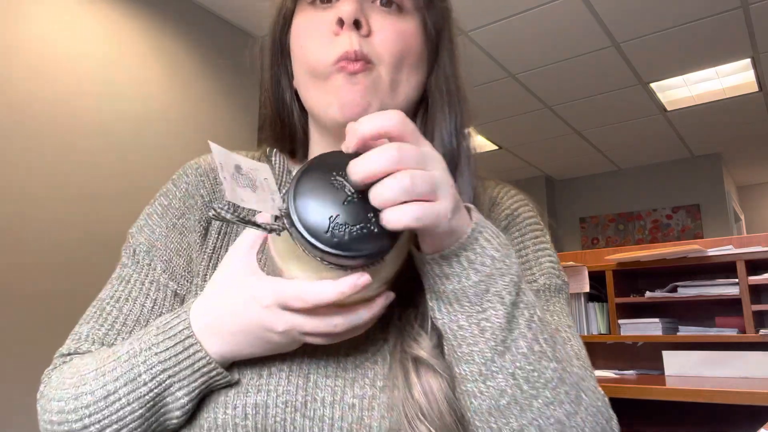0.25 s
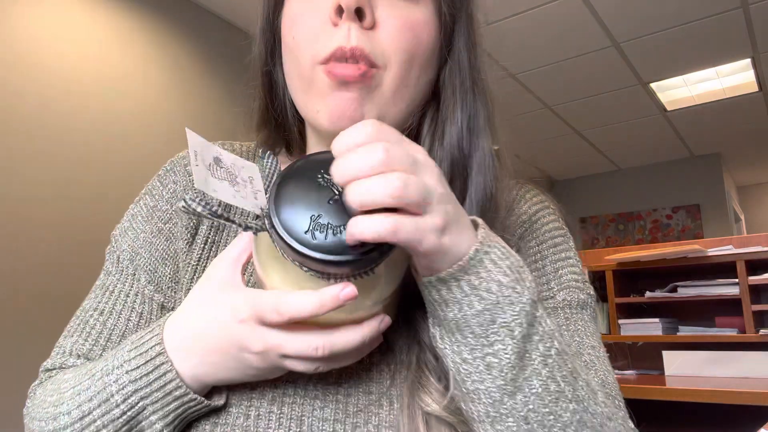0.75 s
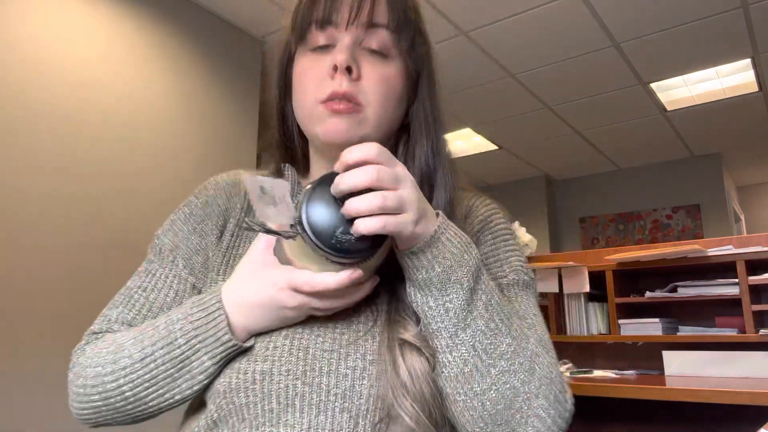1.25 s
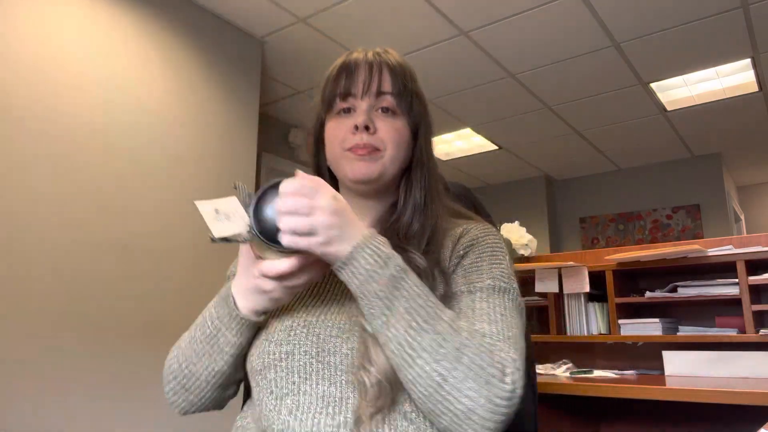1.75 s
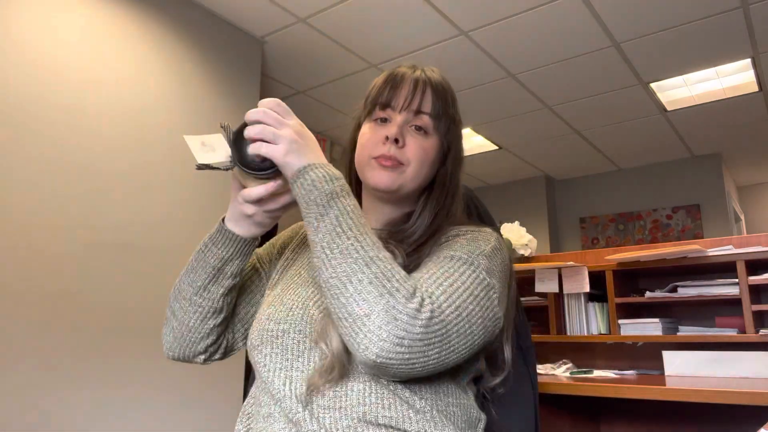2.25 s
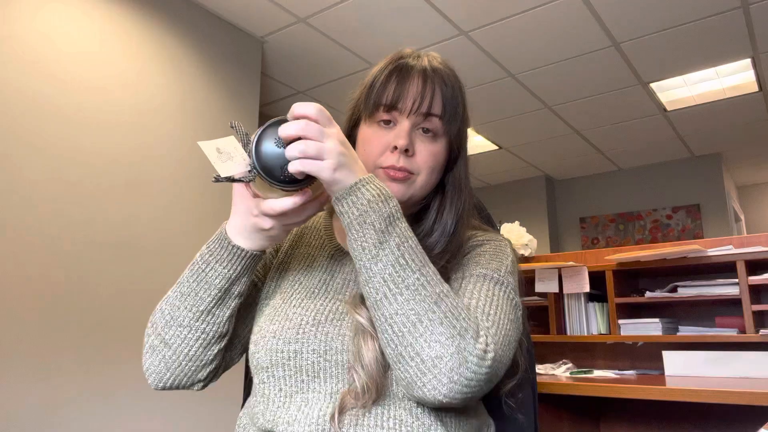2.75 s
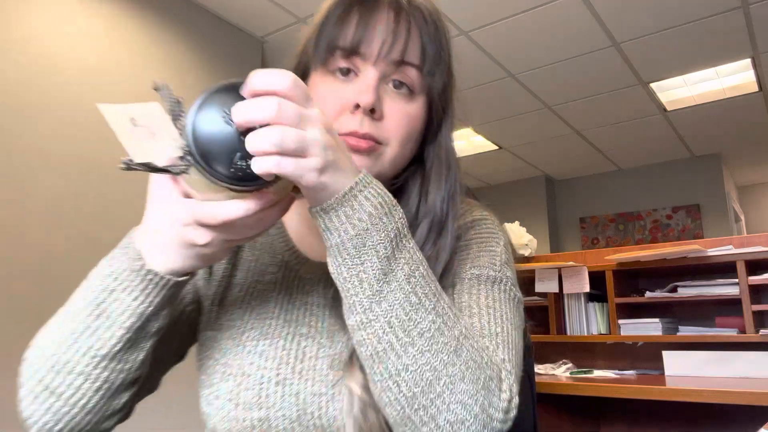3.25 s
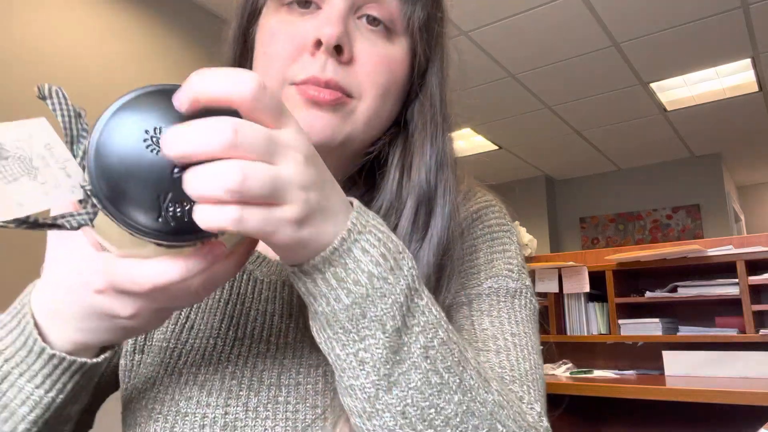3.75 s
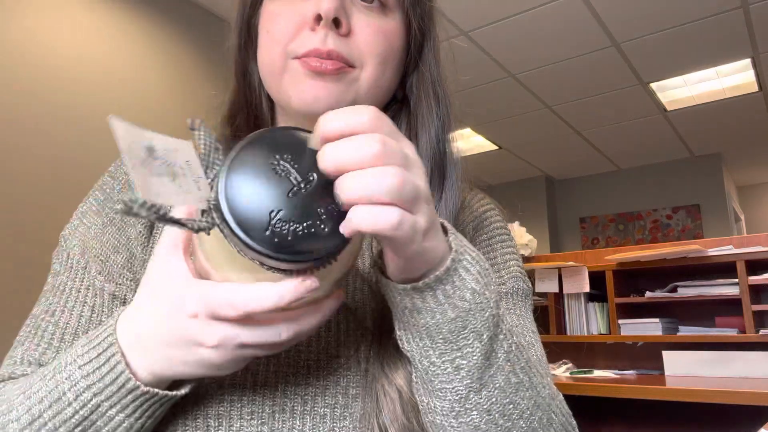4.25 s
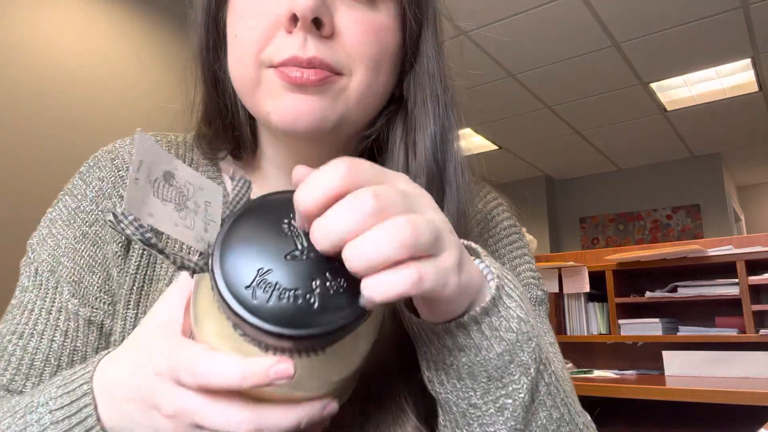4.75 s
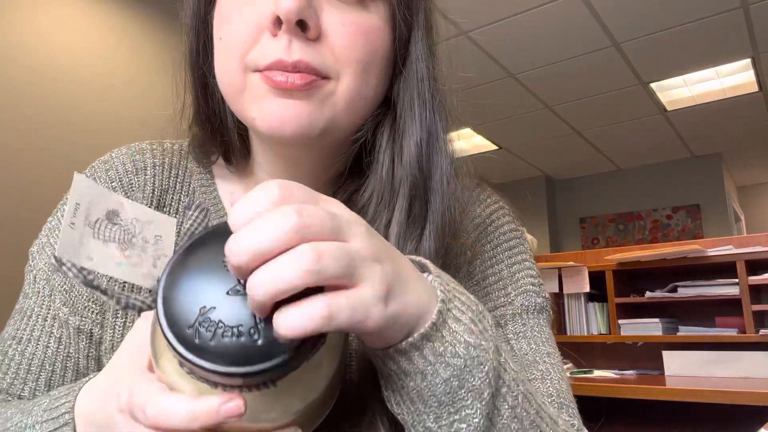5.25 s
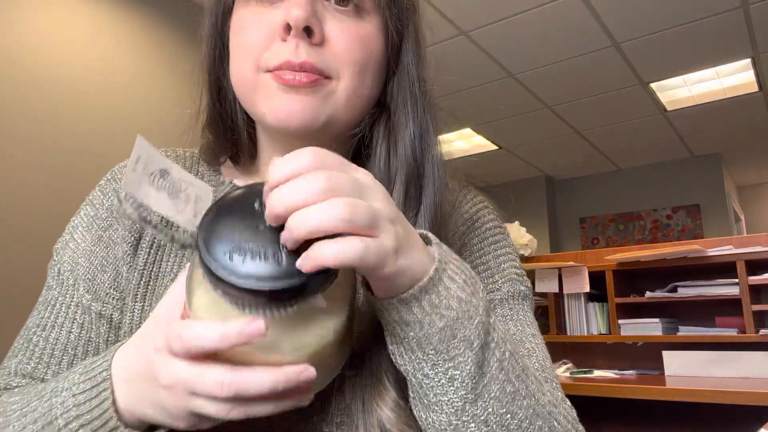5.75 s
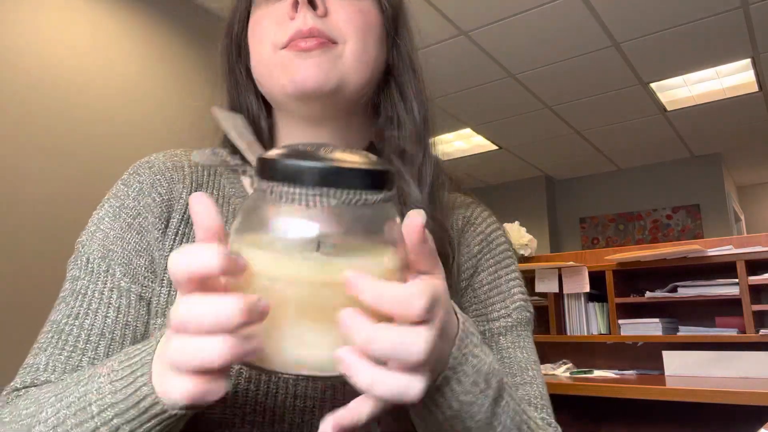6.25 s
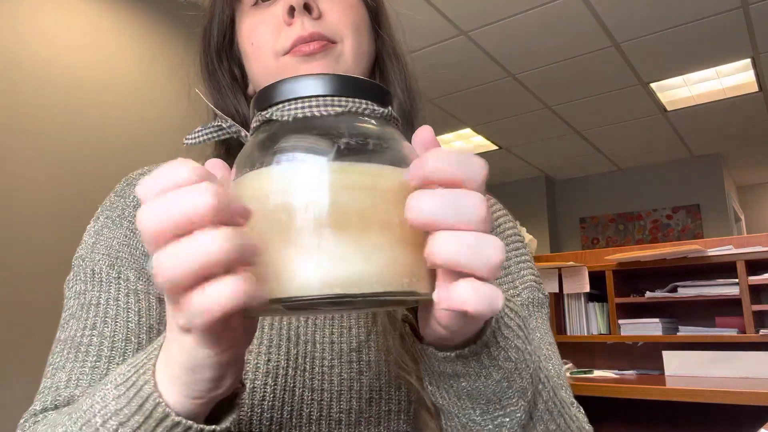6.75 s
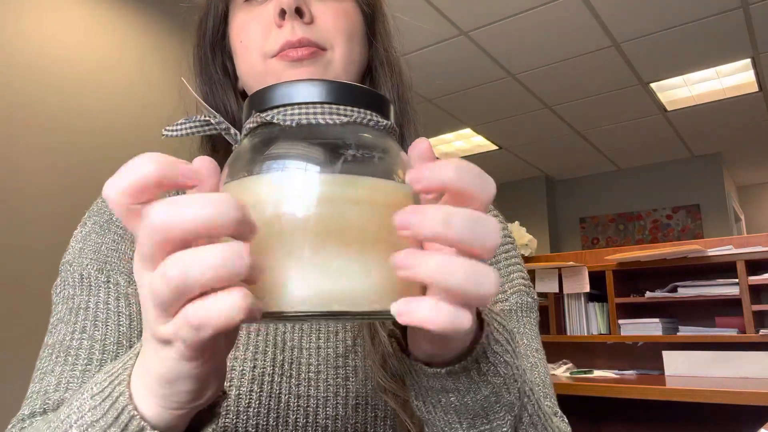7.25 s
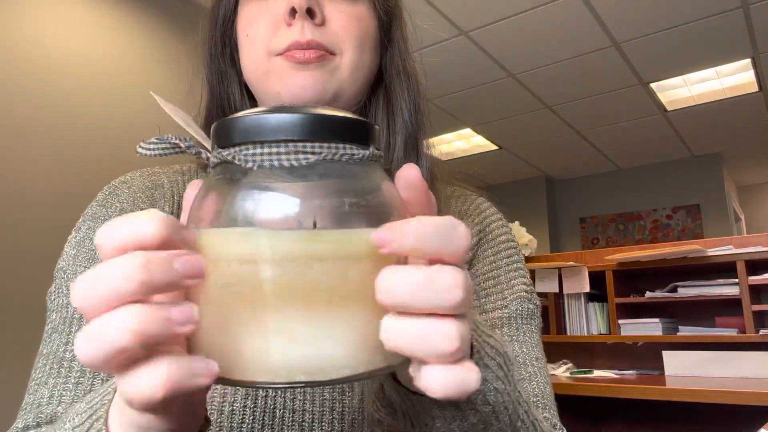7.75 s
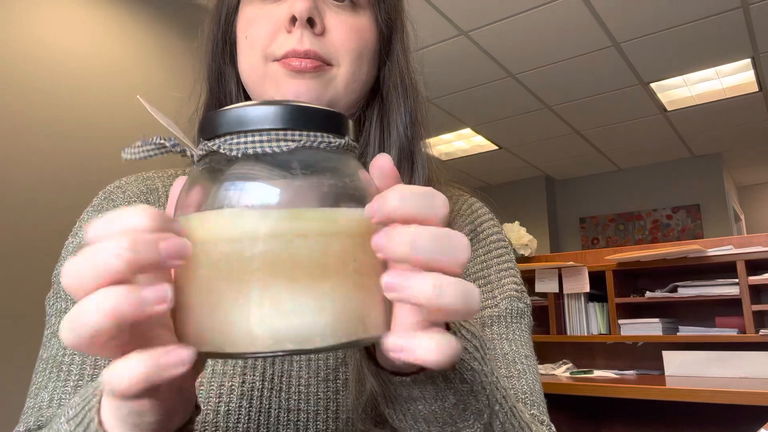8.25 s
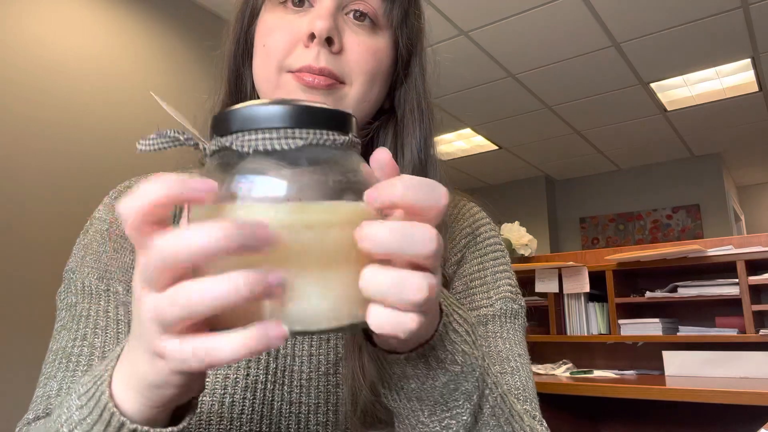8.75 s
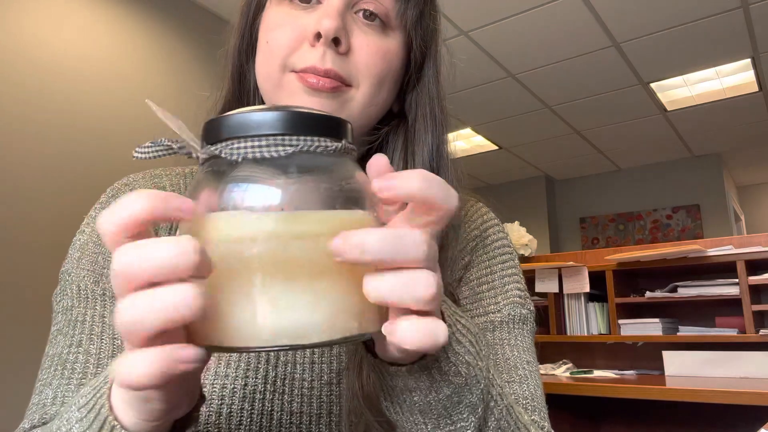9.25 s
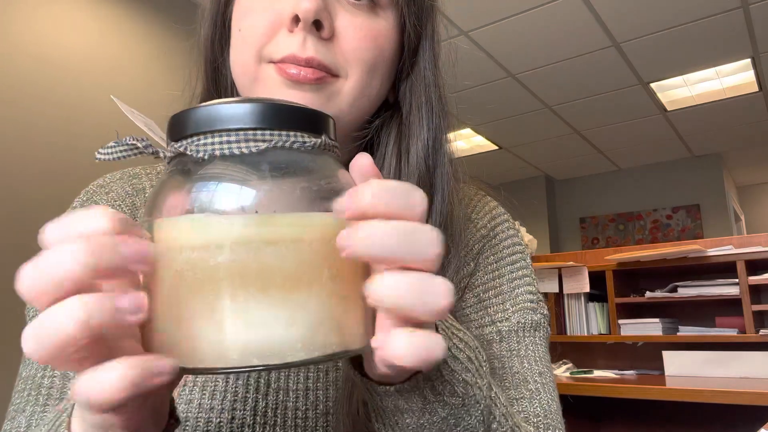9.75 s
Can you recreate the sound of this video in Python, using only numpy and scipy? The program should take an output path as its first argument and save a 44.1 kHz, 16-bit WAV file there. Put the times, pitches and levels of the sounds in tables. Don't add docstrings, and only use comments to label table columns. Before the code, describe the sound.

Nails patter on a metal jar lid right by a stereo phone microphone, each tap crisp on top and hollow beneath, with occasional glassy clinks, light sleeve rumble and finger rustle. After nearly six seconds the drumming stops, the loose lid clatters in two short bursts, and rapid dull little ticks on wax-damped glass follow. Small office with a short echo and soft low air hum.

```python
import sys
import numpy as np
from scipy import signal
from scipy.fft import rfft, irfft, next_fast_len
from scipy.io import wavfile
from scipy.ndimage import uniform_filter1d

SR = 44100
rng = np.random.default_rng(int(sys.argv[2]) if len(sys.argv) > 2 else 0)


def pcm_store(signal):
    levels = np.round(np.clip(np.atleast_2d(signal), -1, 1) * 32767)
    wavfile.write(sys.argv[1], SR, levels.astype(np.int16).T)


def magnitude_from_level(level_db):
    exponent = np.asarray(level_db, float) / 20
    return 10 ** exponent


N = 440118

# time in seconds, level in dB.
HUM_LEVEL = [(0, -45.5), (1.1, -41), (1.6, -35.5), (2.1, -46.5), (3.1, -42), (3.6, -39), (4.8, -45),
             (6.1, -37), (7.2, -42.5), (7.9, -40), (8.4, -42.5), (9.98, -41)]
# frequency in Hz, level in dB per Hz.
AIR_COLOUR = [(53, -32), (90, -5), (257, -3), (472, -12.5), (524, -13), (606, -22.5), (717, -17.5),
              (13500, -63)]
# frequency in Hz, likeness from 0 to 1.
AIR_LIKENESS = [(60, 0.38), (120, 0.79), (250, 0.58), (700, 0.14), (8000, 0.2)]
# frequency in Hz, width in Hz, boost in dB.
DUCT_RESONANCES = [(143, 10, 8), (210, 8.6, 4), (253.5, 11, 6), (299, 8.2, 8), (414, 41, 5.5)]
# time in seconds, level in dB.
STIRRING_LEVEL = [(0, -63), (1.0, -53.5), (1.2, -45), (1.7, -47), (2.0, -80), (3.9, -55.5), (4.1, -49.5),
                  (4.6, -56.5), (4.8, -71), (9.98, -65)]
# frequency in Hz, level in dB per Hz.
STIRRING_COLOUR = [(70, -31), (110, 1), (170, -3), (300, -21.5), (600, -65)]

# start in seconds, ring in dB, knock in dB.
LEANING_IN = [(.0014, -25.5, -22.5), (.0469, -28.5, -32), (.0946, -18, -22.5), (.1029, -42, -23.5),
              (.194, -37.5, -30), (.2399, -28.5, -50), (.2622, -24, -25.5), (.3297, -19.5, -19),
              (.4073, -55, -36.5), (.433, -29, -24), (.4423, -18.5, -22), (.4815, -31, -55),
              (.5002, -25, -26.5), (.5174, -14.5, -20.5), (.593, -20.5, -12), (.623, -36, -38),
              (.6489, -25, -47), (.6627, -24.5, -24), (.6894, -22, -29.5), (.7049, -33, -22),
              (.7178, -17.5, -17.5), (.8371, -26.5, -26), (.9102, -14.5, -17), (.9958, -19, -14),
              (1.0568, -26, -50), (1.0839, -61, -24), (1.1084, -23, -18.5)]
SITTING_BACK = [(1.28, -32, -39), (1.3255, -30, -25), (1.3562, -35.5, -29.5), (1.4534, -49.5, -63),
                (1.526, -53, -38), (1.5587, -47, -35), (1.633, -30.5, -38), (1.6427, -26, -25.5),
                (1.6644, -35, -40.5), (1.6901, -27, -27.5), (1.7181, -34, -24.5), (1.738, -18.5, -20),
                (1.8572, -36, -46), (1.866, -28, -32), (1.8838, -25, -26), (1.9093, -29, -25),
                (1.933, -28, -20), (2.034, -38, -30), (2.0817, -39, -27.5), (2.1018, -24, -26.5),
                (2.3073, -33, -24), (2.3525, -26.5, -38), (2.4944, -35, -24), (2.5217, -25, -21),
                (2.5672, -25.5, -26.5), (2.6072, -29.5, -32.5), (2.695, -53, -21), (2.739, -35, -34),
                (2.774, -33, -34)]
COMING_NEAR = [(2.8393, -26, -19.5), (2.953, -27.5, -28), (3.0466, -29, -27), (3.067, -19, -20),
               (3.1573, -30.5, -20), (3.2243, -34, -26.5), (3.2482, -35, -28.5), (3.2788, -19.5, -20),
               (3.293, -25, -17.5), (3.4178, -43, -20), (3.4512, -24.5, -25), (3.489, -29, -27),
               (3.513, -19, -19.5), (3.6412, -65, -23.5), (3.6551, -55, -24.5), (3.679, -23.5, -23),
               (3.752, -45, -29), (3.7735, -18.5, -17), (3.889, -82, -30), (3.914, -17, -20.5),
               (3.948, -30, -56), (3.9941, -30, -38.5), (4.0045, -20, -20), (4.096, -70, -28.5),
               (4.112, -28, -25), (4.118, -28, -17.5), (4.1847, -25, -22.5), (4.2063, -16, -26),
               (4.365, -39.5, -57)]
HELD_LOW = [(4.383, -36, -36.5), (4.5341, -32, -29.5), (4.5909, -16, -20.5), (4.619, -26, -25.5),
            (4.636, -18, -24), (4.68, -47, -42), (4.6955, -48, -33), (4.7026, -20.5, -17.5),
            (4.7564, -31, -70), (4.807, -38, -31), (4.8383, -20, -20), (4.8713, -26, -27),
            (4.907, -21, -23), (5.0112, -36.5, -36), (5.095, -42, -82), (5.1143, -19.5, -24.5),
            (5.139, -36, -31), (5.224, -23.5, -20.5), (5.255, -22.5, -24.5), (5.2758, -22.5, -24.5),
            (5.3235, -33, -33.5), (5.3588, -17, -21), (5.383, -44, -30), (5.4166, -33.5, -28),
            (5.4625, -23.5, -21), (5.4884, -29, -55), (5.5214, -21, -28), (5.5765, -19, -23),
            (5.5924, -31, -45.5), (5.62, -23, -53)]
BOUTS = [LEANING_IN, SITTING_BACK, COMING_NEAR, HELD_LOW]
BOUT_THUMP_DB = [
    -5,
    -12,
    -7.5,
    -4,
]
# start in seconds, spot from 0 (centre) to 1 (rim).
TAP_SPOTS = [(.047, 1), (.442, 0.44), (.517, 0.39), (.837, 0.28), (.996, 0.5), (1.884, 1), (2.082, 0.83),
             (2.1, 0.52), (2.307, 0.5), (2.84, 0.18), (3.157, 0.41), (3.512, 0.2), (3.68, 0.44),
             (3.913, 0.33), (3.993, 0.38), (4.112, 0.14), (4.185, 0.41), (4.206, 0.65), (4.908, 0.33),
             (5.225, 0.13), (5.276, 0.42), (5.417, 0.2), (5.36, 0.65), (5.577, 1)]
# start in seconds, ring in dB, knock in dB.
GRAZES = [
    (3.503, -13, -19),
    (3.7222, -23, -37),
    (3.7393, -30, -32.5),
    (3.762, -24, -36.5),
    (3.9597, -39, -35),
    (4.2215, -36, -32),
    (6.034, -48.5, -54),
          (0.087, -44, -42), (0.105, -28.5, -24), (0.212, -46, -55), (0.345, -32, -49), (0.354, -51, -36),
           (0.421, -35, -43), (0.534, -59, -49.5), (0.612, -39, -48), (0.64, -35, -37), (0.673, -38.5, -48),
           (0.681, -40, -42), (1.035, -46, -41.5), (1.068, -39.5, -29), (1.297, -50, -52),
           (1.344, -44, -31), (1.769, -30, -40), (1.944, -41, -54), (1.953, -36, -43), (1.968, -37, -43),
           (2.091, -42, -21), (2.298, -41, -34), (2.361, -47, -23), (2.376, -29, -48), (2.385, -47, -35),
           (2.393, -52, -57), (2.549, -30, -19), (2.699, -45, -30), (2.876, -38, -41), (3.03, -39, -41),
           (3.076, -39, -40), (3.207, -30.5, -38), (3.236, -37, -39), (3.337, -32, -35), (3.67, -34, -49),
           (3.804, -33, -56), (3.974, -42, -37), (4.195, -27, -27), (4.343, -46, -37), (4.358, -40, -57),
           (4.614, -48, -36), (4.884, -61, -43), (4.935, -34, -69), (5.159, -35, -60), (5.244, -28, -47),
           (5.348, -46, -52), (5.508, -36, -59), (5.516, -46, -56), (5.541, -49, -55),
           (5.679, -39.5, -47.5)]
# start in seconds, ring in dB, knock in dB, lid thump in dB.
RATTLES = [
    (6.1027, -25, -19.5, -25.5),
    (6.111, -28, -17, -27),
    (6.116, -25.5, -26, -39),
    (6.1216, -43, -24.5, -34.5),
    (6.3552, -29, -19.5, -23.5),
    (6.3593, -41, -19, -31),
    (6.3604, -25, -55, -47.5),
    (6.372, -26, -40, -35),
    (6.375, -47, -20, -55),
]
# frequency in Hz, level in dB, t60 in seconds.
TIN_MODES = [(6300, -5, .09), (6850, -3, .08), (7230, -8, .05), (7470, -6, .1), (7580, -2, .06),
             (8330, 0, .07), (8580, -6, .07), (8960, -8, .07), (9240, -4, .09), (9600, -3, .05),
             (9910, -4, .06), (10250, -3, .07), (10630, -8, .07), (11010, -8, .07), (11500, -11, .07),
             (12080, -12, .05), (12700, -14, .06)]
# frequency in Hz, level in dB, t60 in seconds.
RIM_MODES = [(4760, 0, .18), (4620, -12, .05)]
# frequency in Hz, level in dB, t60 in seconds.
THUMP_MODES = [(150, -15.5, 0.2), (210, 5.5, 0.082), (286.8, 6.5, 0.07)]
# frequency in Hz, level in dB, t60 in seconds.
HOLLOW_MODES = [(554, -9.5, 0.017), (752, 0, 0.02), (972, -0.5, 0.028), (1402, -3.5, .025),
                (1794, -4.5, 0.022), (2493, -7, 0.022)]
# frequency in Hz, level in dB per Hz.
KNOCK_COLOUR = [(160, -26), (330, 2.5), (480, -8), (950, -8), (1400, -12.5), (1800, -12.5), (2500, -17),
                (3100, -28.5), (4200, -21)]
# frequency in Hz, level in dB per Hz.
CRACK_COLOUR = [(2600, -60), (3600, -72), (4700, -5), (5600, -4), (6300, -2), (7600, 5), (10200, -45.5),
                (13000, -4), (13800, -6.5), (15200, 0.5), (16500, -52)]
# start in seconds, level in dB.
SHOULDER_HITS = [(.4423, -34), (0.9965, -26), (2.3068, -24.5), (2.5206, -23.5), (3.1577, -17.5),
                 (3.2777, -35), (3.5034, -36), (3.7734, -28), (4.1141, -13), (4.2057, -30.5), (6.11, -21),
                 (6.3597, -20)]
# frequency in Hz, level in dB, t60 in seconds.
SHOULDER_MODES = [(1720, 3, 0.011), (2230, 1.5, .015), (2920, -5.5, 0.011), (3520, -2.5, 0.017),
                  (3940, 0, 0.013)]

# start in seconds, level in dB.
JOLTS = [
    (1.119, -34),
    (3.303, -21.5),
]
# time in seconds, level in dB.
SLIDE_LEVEL = [(1.26, -68), (1.3, -51), (1.6, -54.5), (1.7, -59), (5.86, -78.5), (5.95, -59), (6.08, -54.5),
               (6.5, -72), (9.98, -68)]
# start in seconds, level in dB, pitch in Hz, t60 in seconds.
RIM_SQUEAK = (1.281, -35, 3350, .045)
# frequency in Hz, level in dB, t60 in seconds.
JAR_MODES = [(1790, 2, 0.047)]

# start in seconds, knock in dB,
# tick in dB.
GLASS_TAPS = [
    (6.252, -35, -46),
    (6.281, -29, -36.5),
    (8.2779, -27.5, -36),
              (6.4925, -25.5, -31), (6.5275, -29, -34), (6.5788, -43, -47), (6.638, -39.5, -35),
               (6.6479, -53, -47), (6.7362, -48, -37), (6.7434, -34.0, -48), (6.7538, -24.5, -33.5),
               (6.794, -40, -45), (6.841, -34, -36), (6.8562, -33, -35.5), (6.9236, -41, -39),
               (6.9393, -26, -31.5), (6.9851, -35.5, -35), (7.0215, -45, -41), (7.053, -36, -38),
               (7.0758, -32, -32.5), (7.0864, -44, -51), (7.1366, -38.5, -40.0), (7.1656, -27.0, -35),
               (7.1958, -25, -32), (7.241, -52, -48.0), (7.257, -35, -41), (7.2768, -35, -35),
               (7.2923, -37.5, -37.5), (7.3551, -22.5, -30.5), (7.3712, -53.0, -51.0), (7.3952, -32.5, -34),
               (7.4244, -41.0, -38), (7.4426, -35.5, -37), (7.4511, -40, -44), (7.4725, -41.5, -45),
               (7.559, -39, -44),
              (7.6366, -43, -44), (7.7, -45, -42), (7.712, -42.5, -41.0), (7.798, -45, -49.0),
                (7.8505, -40.5, -40), (7.8697, -38, -47), (7.8896, -31.5, -34.5), (7.8943, -40, -43.0),
                (7.9547, -50.0, -42), (7.9679, -33, -36.5), (8.0341, -36, -41), (8.0603, -29, -28.5),
                (8.0777, -21.5, -28.5), (8.0809, -35, -48), (8.1074, -35, -47), (8.125, -37, -41),
                (8.1712, -38.0, -38), (8.1813, -28.5, -33.5), (8.2746, -45, -48), (8.3202, -29.5, -36),
                (8.3433, -54, -55.0), (8.3975, -37, -37), (8.4763, -30.5, -36), (8.4932, -39, -52),
                (8.5128, -21, -26), (8.5321, -39, -44), (8.5494, -36.5, -37), (8.5989, -31, -30),
                (8.6158, -32.5, -36), (8.6861, -27.5, -35.5), (8.6995, -44, -54), (8.7117, -40.5, -39),
                (8.8809, -34.0, -37.5),
              (8.9103, -35.0, -35), (8.9305, -39, -40.5), (8.9392, -34, -39), (8.9537, -40, -36),
              (8.9911, -42, -49.0), (9.025, -41.5, -42), (9.0499, -37, -39.5), (9.1449, -29.5, -37.0),
              (9.1766, -26, -34.5), (9.1921, -38.5, -37), (9.2831, -29, -31.5), (9.2984, -48.0, -46),
              (9.3576, -34, -44.5), (9.3658, -27.5, -32.5), (9.373, -43, -46.0), (9.39, -49, -48.0),
              (9.3944, -41.0, -42), (9.4242, -33, -32.5), (9.447, -34, -34), (9.4575, -43, -55.0),
              (9.4925, -29.5, -32.5), (9.5542, -36, -44), (9.5795, -31, -29.5), (9.5861, -29, -33.5),
              (9.6047, -26.5, -31), (9.666, -46, -44.5), (9.7157, -27, -30), (9.7572, -25.5, -33),
              (9.793, -32.5, -34), (9.8002, -33, -44.5), (9.8121, -31.5, -45.0), (9.8206, -36, -33),
              (9.8473, -39, -45)]
# start in seconds, level in dB.
FREE_RINGS = [(6.4926, -60), (6.9392, -61), (7.0759, -57), (7.5598, -59), (7.7129, -59.5), (7.967, -55),
              (8.0603, -55), (8.1808, -55), (8.6145, -55), (9.2855, -43.5), (9.365, -62), (9.4473, -58),
              (9.4923, -49), (9.5865, -55), (9.7156, -51)]
# frequency in Hz, level in dB, t60 in seconds.
GLASS_MODES = [(850, -2, .006), (1310, 0, .006), (1810, -20, .03), (2000, -1, .005), (2600, 0, .006),
               (4700, -9, .006)]
# frequency in Hz, level in dB per Hz.
TICK_COLOUR = [(1760, -47), (3000, -39), (3460, -51), (4670, 10), (6040, 8), (7800, 8.5), (9800, 4.5),
               (12700, 3), (16500, 0)]

# frequency in Hz, t60 in seconds.
ROOM_T60 = [(250, .3), (4000, .25), (12400, .2), (16000, .14)]
# frequency in Hz, likeness from 0 to 1.
ROOM_LIKENESS = [(4000, 0.069), (8500, 0.79)]
# frequency in Hz, lead of the left port in radians.
PORT_PHASE = [(0, 0), (780, 0.6), (2410, -0.4), (3880, -0.7), (5510, -2.3), (7320, -1.6), (9390, -0.1),
              (10900, 0.2), (13400, 3.2), (16300, 3.2)]
# frequency in Hz, left minus right in dB.
PORT_DB = [(120, 3.5), (350, -3), (800, -3), (2000, 3.5), (4500, -2.5), (9000, -1)]


def evened(x):
    return x / np.sqrt(np.mean(x ** 2) + 1e-20)


def read(points, hz):
    f, value = np.transpose(points)
    return np.interp(np.log(hz + 1), np.log(f + 1), value)


def curve(rows):
    return np.interp(np.arange(N) / SR, *np.transpose(rows))


def coloured(x, points):
    size = x.shape[-1]
    gain = magnitude_from_level(read(points, np.fft.rfftfreq(size, 1 / SR)))
    return irfft(rfft(x) * gain, size)


def strikes(times, levels_db, shapes):
    out = np.zeros(N + shapes.shape[1])
    for s, db, shape in zip(times, levels_db, shapes):
        out[round(s * SR):][:len(shape)] += magnitude_from_level(db) * shape / abs(shape).max()
    return out[:N]


def rings(modes, count, spread_db, rise, detune=0.0013):
    hz, db, t60 = np.transpose(modes)[:, :, None]
    t = np.arange(round(.7 * t60.max() * SR)) / SR
    fade = magnitude_from_level(db - 60 * t / t60) * (1 - np.exp(-t / rise))
    chance = rng.standard_normal((count, 3, len(modes), 1))
    shapes = []
    for strength, sign, bend in chance:
        tones = np.sin(2 * np.pi * hz * (1 + detune * bend) * t)
        shapes.append((magnitude_from_level(spread_db * strength) * np.sign(sign) * fade * tones).sum(0))
    return np.array(shapes)


def cracks(points, count, t60, size=2048, rise=.0001):
    t = np.arange(size) / SR
    noise = coloured(rng.standard_normal((count, size)), points)
    return noise * magnitude_from_level(-60 * t / t60) * (1 - np.exp(-t / rise)) ** 2


def chatter(shapes, per_s, db, t60):
    t = np.arange(1500)[:, None] / SR
    chance, strength = rng.random((2, 1500, len(shapes)))
    bounces = (chance < per_s / SR) * (2 * strength - 1) * magnitude_from_level(db - 60 * t / t60)
    bounces[0] = 1
    return signal.fftconvolve(shapes, bounces.T, axes=1)


def shaken(shapes, t60, lumpy_db=7.5):
    t = np.arange(6000) / SR
    shiver, lumps = rng.standard_normal((2, len(shapes), len(t)))
    lumps = evened(uniform_filter1d(lumps, size=250))
    return signal.fftconvolve(shapes, shiver * magnitude_from_level(lumpy_db * lumps - 60 * t / t60), axes=1)


def ventilation():
    hz = np.fft.rfftfreq(N, 1 / SR)
    left, other, hum = rfft(rng.standard_normal((3, N)))
    same = np.clip(read(AIR_LIKENESS, hz), 0, 1)
    right = same * left + np.sqrt(1 - same ** 2) * other
    duct_db = sum(db / (1 + ((hz - f) / width) ** 2) for f, width, db in DUCT_RESONANCES)
    air = irfft(np.array([left, right]) * magnitude_from_level(read(AIR_COLOUR, hz) + duct_db) * (hz > 90), N)
    broad = 1 / (1 + ((hz - 68) / 20.0) ** 2)
    narrow = 2.4 / (1 + ((hz - 59.5) / 2.9) ** 2)
    hum = irfft(hum * (broad + narrow), N)
    return magnitude_from_level(-46.5) * evened(air) + magnitude_from_level(curve(HUM_LEVEL)) * evened(hum)


def stirring():
    noise, lumps = rng.standard_normal((2, N))
    lumps_db = 3.0 * evened(uniform_filter1d(lumps, size=2500))
    return magnitude_from_level(curve(STIRRING_LEVEL) + lumps_db) * evened(coloured(noise, STIRRING_COLOUR))


def sparks(count):
    hz = rng.uniform(7300, 12300, (count, 1))
    t = np.arange(500) / SR
    noise = uniform_filter1d(rng.standard_normal((2, count, 500)), size=14)
    band = noise[0] * np.cos(2 * np.pi * hz * t) + noise[1] * np.sin(2 * np.pi * hz * t)
    return band * t * np.exp(-t / .0013)


def tin(s, ring_db, knock_db):
    n = len(s)
    modes = rings(TIN_MODES, count=n, spread_db=4.5, rise=.0009, detune=.007)
    quick = modes[:, :1800] * magnitude_from_level(-60 * np.arange(1800) / SR / 0.12)
    start = modes[:, :500] * np.hanning(1000)[500:]
    hollow = rings(HOLLOW_MODES, count=n, spread_db=4.0, rise=.0007, detune=.05)
    knock = cracks(KNOCK_COLOUR, count=n, t60=0.028, rise=0.00041)
    out = strikes(s, ring_db - 11.0, chatter(quick, 460, -9.0, 0.033))
    out += strikes(s, ring_db - 4.0, cracks(CRACK_COLOUR, count=n, t60=0.019, rise=0.0007))
    out += strikes(s, ring_db + 1.5, sparks(count=n))
    out += strikes(s, ring_db - 10.5, shaken(start, 0.083))
    out += strikes(s, knock_db - 1.0, chatter(knock, 270, -4.0, 0.081))
    out += strikes(s, knock_db - 6.0, chatter(hollow, 240, -7.5, 0.034))
    body = cracks(KNOCK_COLOUR, count=n, t60=0.06, size=4096, rise=0.0042)
    return out + strikes(s, knock_db - 16.5, body)


def lid():
    taps = sum(BOUTS, [])
    s, _, knock_db = np.transpose(taps)
    spot = np.full(len(s), 0.16)
    for at, place in TAP_SPOTS:
        spot[abs(s - at).argmin()] = place
    spot = np.clip(spot, .001, .999)

    low_db = knock_db - 5 + 25 * np.log10(spot)
    low = rings(RIM_MODES, count=len(s), spread_db=3.0, rise=.0006, detune=.003)
    out = strikes(s, low_db - 8.0, low)
    out += strikes(s, low_db - 6.0, shaken(low[:, :450], .16, lumpy_db=5))

    bout_db = np.repeat(BOUT_THUMP_DB, [len(bout) for bout in BOUTS])
    tap_thump_db = knock_db + bout_db + 20 * np.log10(1 - spot)
    rattle_s, _, _, rattle_thump_db = np.transpose(RATTLES)
    thump_s = np.r_[s, rattle_s]
    thump_db = np.r_[tap_thump_db, rattle_thump_db - 2.0]
    thumps = rings(THUMP_MODES, count=len(thump_s), spread_db=2.0, rise=0.00016, detune=0.0018)
    out += strikes(thump_s, thump_db, thumps)
    contacts = [row[:3] for row in taps + RATTLES + GRAZES]
    return out + tin(*np.transpose(contacts))


def shoulder():
    s, db = np.transpose(SHOULDER_HITS)
    clinks = rings(SHOULDER_MODES, count=len(s), spread_db=1.5, rise=0.00021, detune=.03)
    return strikes(s, db, chatter(clinks, 300, -13.0, 0.022))


def jolts():
    t = np.arange(2900) / SR
    hz = 55 + 260 * np.exp(-t / 0.0137)
    wobble = np.sin(2 * np.pi * np.cumsum(hz) / SR) * np.hanning(len(t))
    s, db = np.transpose(JOLTS)
    return strikes(s, db, np.tile(wobble, (len(s), 1)))


def slide():
    force = magnitude_from_level(2.2 * rng.exponential(1, N))
    slips = force * (rng.random(N) < 4000 / SR) * rng.choice([-1, 1], N)
    crisp = evened(cracks(CRACK_COLOUR, count=1, t60=0.045)[0])
    dull = evened(cracks(KNOCK_COLOUR, count=1, t60=0.048)[0])
    rustle = signal.oaconvolve(slips, crisp + 21.0 * dull)[:N]
    return magnitude_from_level(curve(SLIDE_LEVEL)) * evened(rustle)


def jar():
    at, db, hz, t60 = RIM_SQUEAK
    squeak = shaken(rings([(hz, 0, .01)], count=1, spread_db=0, rise=.001), t60)
    s, _, knock_db, _ = np.transpose(RATTLES)
    ringing = rings(JAR_MODES, count=len(s), spread_db=0, rise=0.0023)
    return strikes([at], [db], squeak) + strikes(s, knock_db - 15.0, ringing)


def glass():
    s, knock_db, tick_db = np.transpose(GLASS_TAPS)
    knocks = rings(GLASS_MODES, count=len(s), spread_db=3.5, rise=.0001, detune=.06)
    ticks = cracks(TICK_COLOUR, count=len(s), t60=0.013)
    at, ring_db = np.transpose(FREE_RINGS)
    free = rings([(1830, 0, .022)], count=len(at), spread_db=0, rise=.001, detune=.02)
    free = shaken(free, .16, lumpy_db=4)
    out = strikes(s, knock_db + 0.26, knocks) + strikes(s, tick_db + 0.24, ticks)
    return out + strikes(at, ring_db + 2.0, free)


def room(x):
    taps = np.zeros((2, 22000))
    at = np.arange(150, 21900, 20) + rng.integers(0, 20, (2, 1088))
    np.put_along_axis(taps, at, rng.choice([-1., 1.], at.shape), 1)
    hz, t, z = signal.stft(taps, SR, nperseg=256)
    same = np.clip(read(ROOM_LIKENESS, hz), 0, 1)[:, None]
    z = np.array([z[0], same * z[0] + np.sqrt(1 - same ** 2) * z[1]])
    fade = magnitude_from_level(-60 * t / read(ROOM_T60, hz)[:, None])
    tail = signal.istft(z * fade, SR, nperseg=256)[1]
    tail = tail * (1 + 3.0 * np.exp(-np.arange(tail.shape[1]) / SR / 0.0059))
    return signal.fftconvolve(x[None], tail / np.linalg.norm(tail[0]), axes=1)[:, :N]


def ports(x, widest):
    size = next_fast_len(N + 4096)
    hz = np.fft.rfftfreq(size, 1 / SR)
    phase = np.minimum(np.interp(hz, *np.transpose(PORT_PHASE)), widest)
    half = magnitude_from_level(read(PORT_DB, hz) / 2) * np.exp(.5j * phase)
    return irfft(rfft(x, size) * np.array([half, 1 / half]), size)[:, :N]


def scene():
    tins = lid()
    ticks = glass()
    rest = slide() + jar() + shoulder()
    echo = magnitude_from_level(-5.0) * room(tins + rest + magnitude_from_level(-4.5) * ticks)
    heard = ports(ticks, widest=2.4) + ports(tins + rest + echo, widest=np.pi)
    return heard + jolts() + stirring() + ventilation()


def low_pass(x):
    return signal.sosfilt(signal.butter(12, 16690, fs=SR, output="sos"), x)


def record(dry):
    hz = np.fft.rfftfreq(N, 1 / SR)
    delay = .03 / (1 + (hz / 150) ** 3)
    cut = 1 / (1 + (48 / (hz + 1)) ** 4 + (hz / 15900) ** 40)
    cut = cut * (1 - .7 / (1 + ((hz - 5550) / 260) ** 4))
    cut = cut * (1 - .4 / (1 + ((hz - 3700) / 350) ** 4))
    turn = np.exp(-2j * np.pi * np.cumsum(delay) * SR / N)
    late = irfft(rfft(dry) * cut * turn, N)
    return low_pass(late)


dry = scene()
out = record(dry)
pcm_store(out)
```